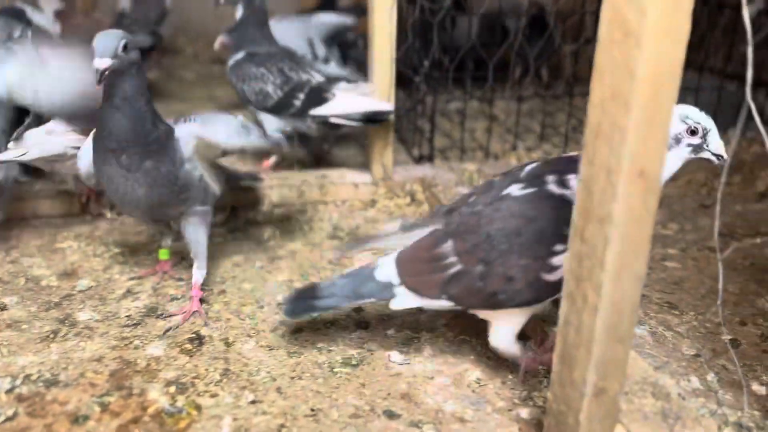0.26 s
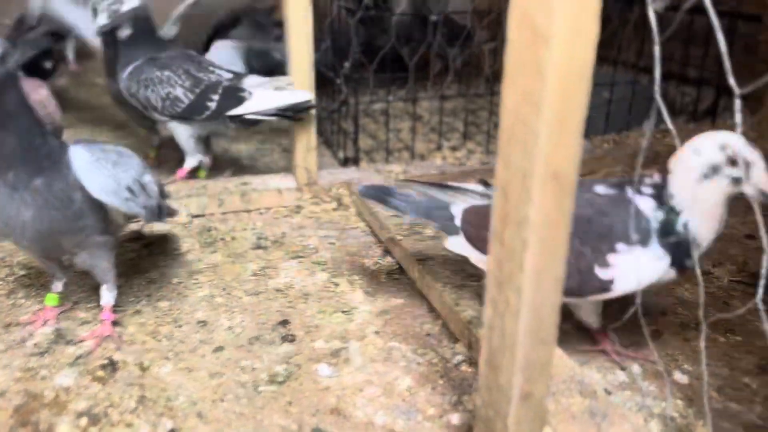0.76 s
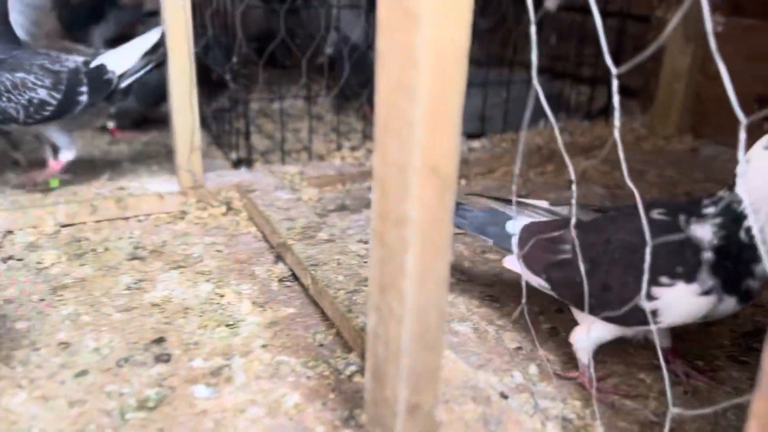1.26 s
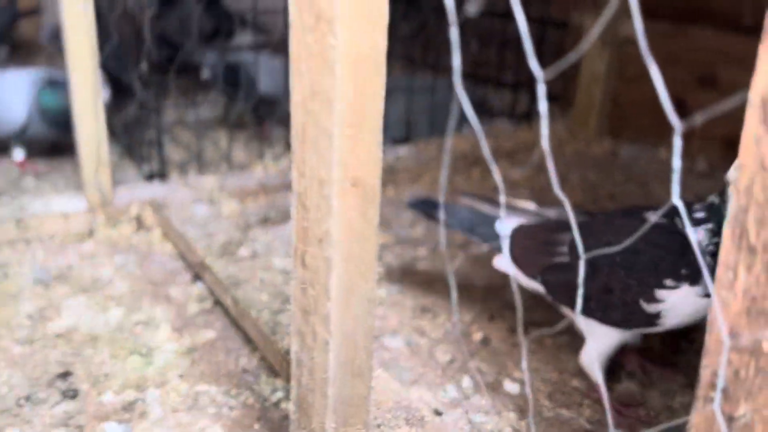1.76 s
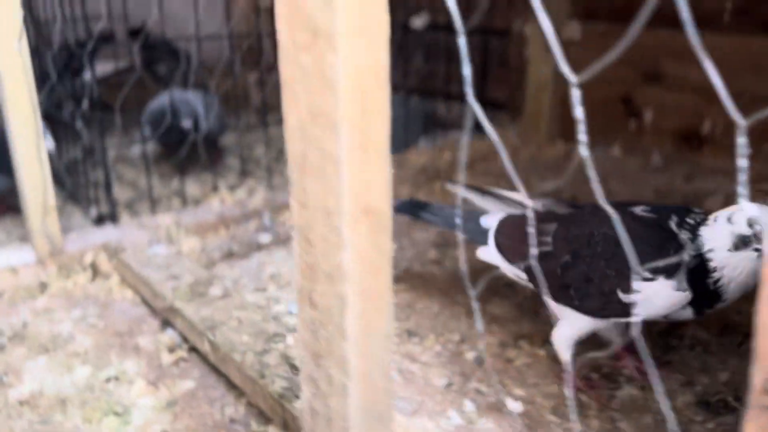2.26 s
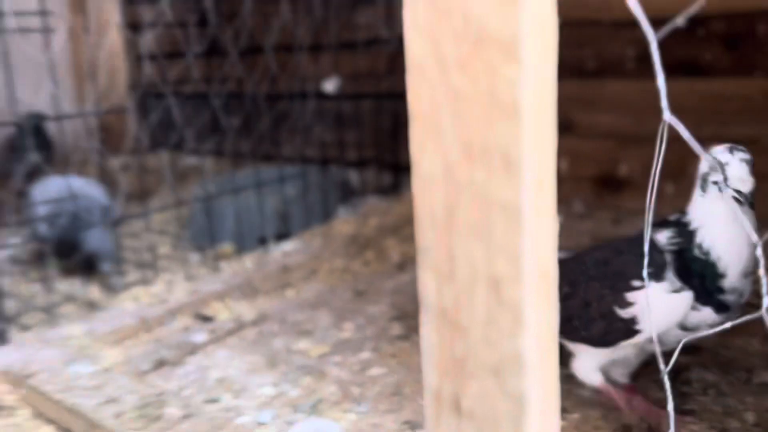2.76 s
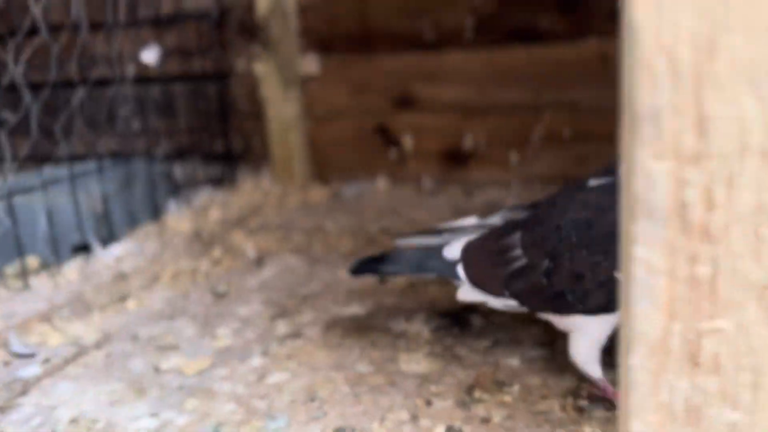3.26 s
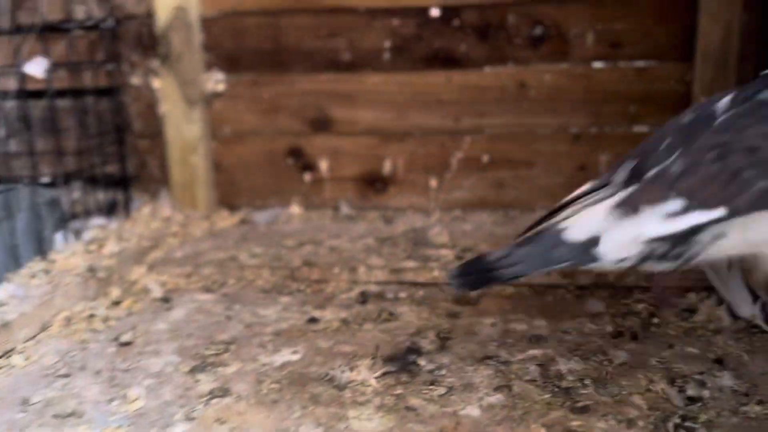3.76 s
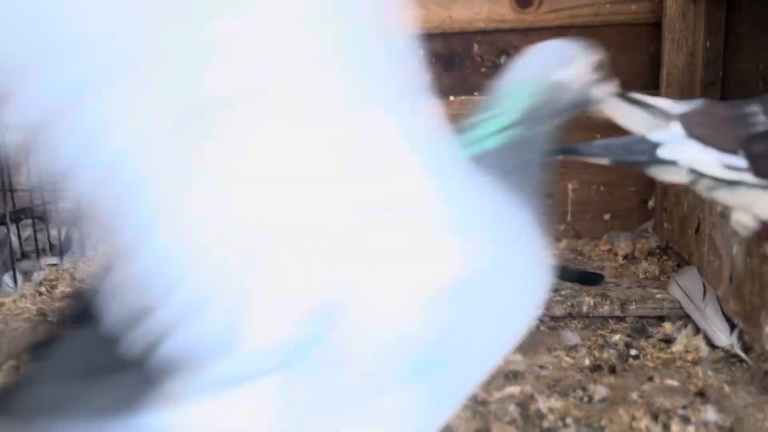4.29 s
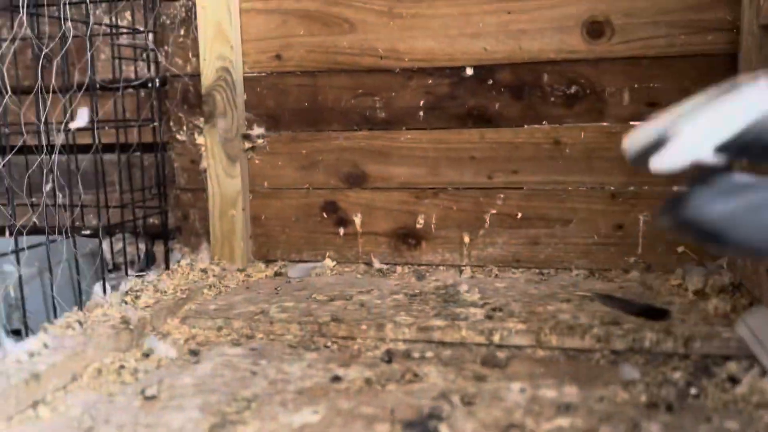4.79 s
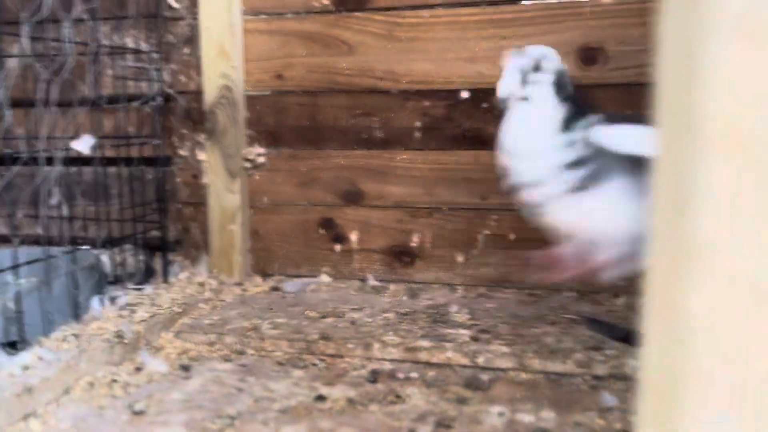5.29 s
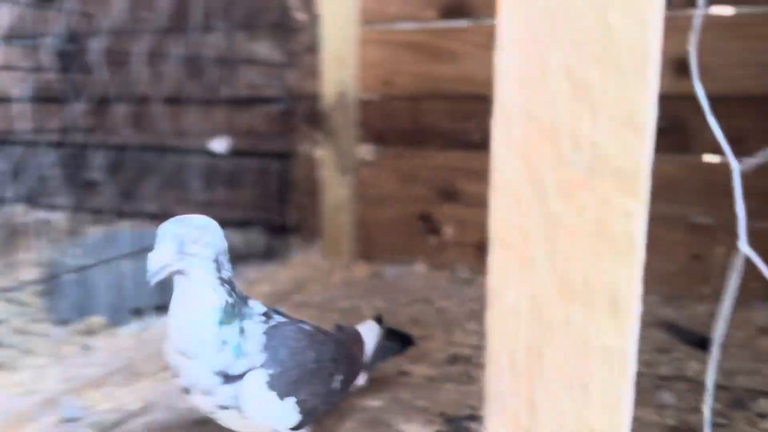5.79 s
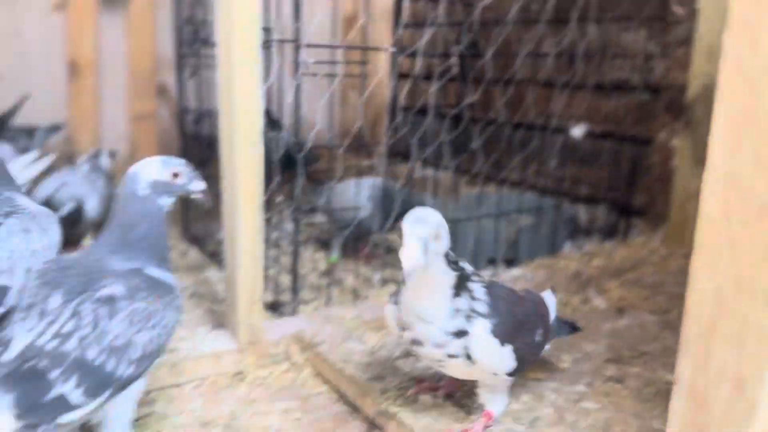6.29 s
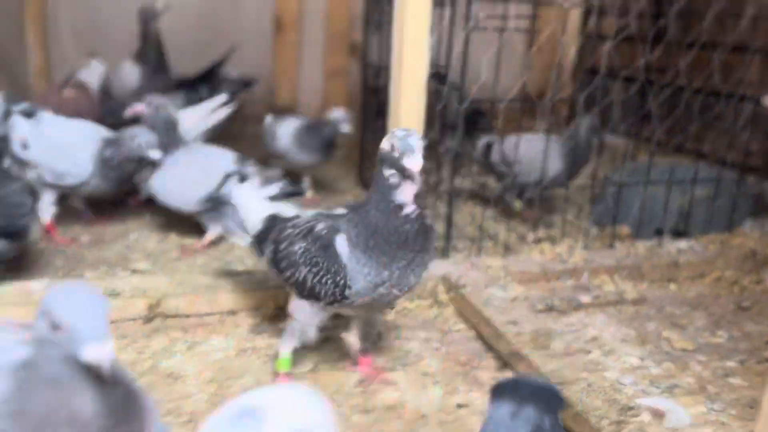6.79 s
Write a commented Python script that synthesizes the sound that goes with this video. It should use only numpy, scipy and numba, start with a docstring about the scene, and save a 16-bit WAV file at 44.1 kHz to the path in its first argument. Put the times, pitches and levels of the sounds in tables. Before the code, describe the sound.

High, hoarse begging squeaks of young pigeons overlap with close wing claps, rustling and light footfalls on wooden boards.

```python
"""Long wavering squeaks of young pigeons begging fill a crowded wooden loft. Each is a gliding whistle,
roughened by a fluttering membrane and rasping breath. Feathers rustle, wings clap and brush, and their
draught buffets a low microphone with eddies. Feet set the boards ringing, quills snap, claws briefly
ping the wire mesh, and the walls return a short, dull reverberation."""
import sys
import numpy as np
from scipy import signal
from scipy.io import wavfile
from scipy.ndimage import uniform_filter1d
from numba import njit

SR = 44100
rng = np.random.default_rng(int(sys.argv[2]) if len(sys.argv) > 2 else 0)


def generate_wav(signal):
    """Clip the signal to [-1, 1] and save it as 16-bit WAV at the path in sys.argv[1]."""
    frames = np.transpose(np.atleast_2d(signal))
    scaled = np.clip(frames, -1, 1) * 32767
    pcm = np.round(scaled).astype(np.int16)
    wavfile.write(sys.argv[1], SR, pcm)


N = 310905
ANTIPHASE = np.array([[1], [-1]])  # left plus, right minus


def undb(db):
    return 10 ** (np.asarray(db) / 20)


def level(x, db):
    """Scale a signal to an RMS level."""
    return x * undb(db) / np.sqrt(np.mean(x ** 2))


def band(x, lo_hz, hi_hz, order=2):
    return signal.sosfilt(signal.butter(order, [lo_hz, hi_hz], "band", fs=SR, output="sos"), x)


def walk(rate_hz):
    """Smooth random modulation: values held for 1 / rate_hz seconds, averaged twice; spread near 1."""
    hold = int(SR / rate_hz)
    held = np.repeat(rng.standard_normal(N // hold + 1), hold)
    return 1.6 * uniform_filter1d(uniform_filter1d(held, hold), hold)[:N]


def curves(table):
    """Linear interpolation of each column against the times in the first."""
    times, *columns = np.transpose(table)
    return [np.interp(np.arange(N) / SR, times, column) for column in columns]


def ports(x, pan_db, lag_samples=23):
    """Level and time differences place a source between two microphone ports; the right one lags."""
    return np.array([x * undb(pan_db / 2), np.roll(x, lag_samples) * undb(-pan_db / 2)])


def bursts(impulses, decay_s):
    """Exponential decay: each impulse starts a dying burst of noise."""
    return signal.lfilter([1], [1, -np.exp(-1 / (decay_s * SR))], impulses) * rng.standard_normal(N)


def ring(force, modes):
    """Modal superposition: a struck body answers with a sum of damped sinusoids."""
    out = 0
    for hz, db, t60_s in modes:
        pole = np.exp((2j * np.pi * hz - np.log(1000) / t60_s) / SR)
        out = out + undb(db) * signal.lfilter([1], [1, -pole], force).imag
    return out


# Begging calls. Each row: hoarseness from 0 to 1, then a list of points.
# Each point: time in seconds, pitch in Hz, level in dB.
SQUEAKS = [ (0.28, [(0, 4046, -34), (.046, 3920, -37.5), (.1, 3140, -38), (.125, 3500, -41),
           (.15, 3456, -40), (.19, 3380, -40.5), (.25, 3500, -45), (.3, 3580, -43), (.38, 3620, -47)]),
           (0.26, [(.35, 4220, -48), (.4, 4340, -37), (.44, 4670, -43), (.49, 4450, -41),
           (.53, 4264, -41.5), (.62, 4160, -35)]), (0.17, [(.34, 3750, -53), (.4, 3900, -54),
           (.44, 4350, -47), (.47, 4360, -41), (.53, 4080, -40)]), (0.315, [(.44, 2590, -44),
           (.52, 3290, -42), (.58, 3330, -52), (.65, 3380, -42), (.74, 3455, -49.5), (.8, 3560, -47),
           (.97, 3440, -45)]), (0.33, [(.74, 3830, -40), (.8, 4370, -44), (.86, 4170, -51),
           (.92, 4280, -48), (.98, 3850, -43), (1.03, 4300, -36)]), (0.23, [(1.12, 2570, -45),
           (1.18, 3160, -39), (1.2, 3940, -38.5), (1.305, 3880, -39), (1.345, 4280, -42.5),
           (1.39, 3970, -45), (1.45, 4310, -43), (1.5, 3870, -41.5), (1.59, 4260, -46), (1.67, 3870, -46),
           (1.83, 3950, -60)]), (0.22, [(1.31, 4350, -46), (1.34, 4680, -38), (1.37, 4370, -57),
           (1.44, 4700, -37), (1.5, 4250, -58), (1.56, 4790, -35), (1.62, 4480, -45), (1.65, 4770, -42),
           (1.71, 4490, -37), (1.775, 4800, -39), (1.82, 3870, -44.5), (1.845, 2610, -46)]),
           (0.423, [(2.0, 2520, -51), (2.12, 2698, -48.5), (2.17, 3300, -33.5), (2.21, 3150, -46),
           (2.25, 3400, -34), (2.31, 3450, -55), (2.36, 3430, -37.5), (2.42, 3376, -49), (2.5, 3360, -41),
           (2.55, 3340, -45.5), (2.61, 3380, -34.5), (2.67, 3450, -38.5), (2.72, 3650, -47),
           (2.84, 3260, -41.5), (2.87, 3210, -40), (2.9, 2726, -38), (2.93, 3150, -42), (2.96, 2850, -61)]),
           (0.364, [(2.11, 3110, -51), (2.17, 3844, -54), (2.21, 3260, -39.5), (2.27, 4000, -43),
           (2.33, 4040, -36), (2.365, 4280, -37), (2.42, 4110, -47), (2.47, 4240, -43), (2.52, 4150, -41.5),
           (2.57, 4020, -49), (2.625, 4170, -41), (2.68, 4050, -51), (2.73, 4120, -41), (2.78, 4070, -55)]),
           (0.35, [(2.335, 3970, -48), (2.385, 3600, -38.5), (2.43, 3900, -48), (2.5, 3630, -41.5),
           (2.56, 3690, -45.5), (2.63, 3850, -43), (2.67, 3750, -54)]), (0.55, [(2.26, 4050, -48),
           (2.32, 4560, -44), (2.4, 4580, -50), (2.78, 4670, -46.5)]), (0.28, [(3.27, 2687, -35),
           (3.35, 3127, -40), (3.43, 3033, -43), (3.5, 3520, -47), (3.53, 3580, -31), (3.59, 3554, -34.5),
           (3.62, 3200, -36.5), (3.68, 3410, -43), (3.77, 3540, -42), (3.84, 3380, -44), (3.9, 3270, -39),
           (3.97, 3115, -38.5), (4.03, 2590, -49.5)]), (0.25, [(3.62, 4490, -46), (3.66, 4550, -39),
           (3.7, 4580, -43), (3.75, 4770, -44), (3.82, 4730, -35), (3.87, 4520, -41.5),
           (3.94, 3735, -45.5)]), (0.93, [(3.27, 3196, -42), (3.31, 3533, -54), (3.4, 3630, -56),
           (3.5, 3770, -46), (3.6, 3990, -41)]), (0.56, [(3.64, 3600, -43), (3.7, 3730, -46),
           (3.76, 3880, -40.5), (3.82, 4060, -52)]), (0.27, [(4.7, 3610, -59), (4.77, 3620, -52),
           (4.81, 3880, -50), (4.89, 3690, -45), (5.17, 3852, -41.5), (5.21, 4170, -40), (5.27, 4080, -36),
           (5.325, 4620, -33.5), (5.35, 4290, -33), (5.38, 4100, -36), (5.43, 4330, -35), (5.5, 4070, -43),
           (5.55, 4760, -29.5), (5.6, 4900, -40), (5.66, 4670, -50)]), (0.3, [(4.785, 2700, -43),
           (4.83, 3180, -36), (4.89, 2824, -40.5), (5.0, 3590, -46), (5.06, 3350, -34), (5.11, 3610, -45),
           (5.17, 3470, -33.5), (5.22, 3426, -48), (5.27, 3540, -35.5), (5.34, 3530, -46),
           (5.41, 3630, -43), (5.47, 3600, -49), (5.51, 3470, -47), (5.62, 3420, -51.5), (5.72, 3230, -49),
           (5.76, 3200, -43), (5.8, 3150, -51)]), (0.16, [(5.9, 2830, -52), (5.93, 3240, -49),
           (5.98, 2980, -58), (6.13, 3260, -65)]), (0.461, [(6.17, 2620, -41), (6.23, 3210, -42),
           (6.45, 3403, -46.5), (6.6, 3370, -42), (6.66, 3620, -36)]), (0.24, [(6.7, 3450, -32),
           (6.77, 3590, -42), (6.84, 3415, -39), (6.9, 3350, -51), (6.97, 3295, -37.5), (7.05, 3110, -55)]),
           (0.46, [(6.19, 3156, -45), (6.25, 3950, -48), (6.31, 3600, -42), (6.36, 3820, -43.5),
           (6.45, 4130, -42.5), (6.64, 4360, -37)]), (0.273, [(6.71, 3890, -41.5), (6.87, 3900, -45),
           (6.94, 3930, -48), (7.0, 3680, -50), (7.05, 4180, -43)]), ]


def squeaks(flutter_hz=400, quaver=.008, jump_s=.03, fade_s=.015, beak_hz=7700, beak_width_hz=1300):
    """Modulation by a fluttering membrane and rasping air adds sidebands that make a whistle hoarse."""
    out, t = np.zeros(N), np.arange(N) / SR
    for hoarse, points in SQUEAKS:
        hz, effort_db = uniform_filter1d(curves(points), int(.008 * SR))
        held = np.repeat(rng.standard_normal(int(N / SR / jump_s) + 1), int(jump_s * SR) + 1)[:N]
        jumps = .014 * uniform_filter1d(held, int(.004 * SR))
        detune = quaver * walk(55) + jumps + (.003 + .045 * hoarse ** 2) * walk(400)
        flutter = np.sin(2 * np.pi * np.cumsum(flutter_hz * (1 + .15 * walk(30))) / SR)
        phase = 2 * np.pi * np.cumsum(hz * (1 + detune)) / SR + (.2 + 1.5 * hoarse ** 2) * flutter
        resonance = np.exp(-((2 * hz - beak_hz) / beak_width_hz) ** 2)  # the beak passes the octave
        octave = undb(-13) * (1.35 + .54 * walk(60)) * resonance * np.sin(2 * phase)
        swell_db = 2 * walk(75)
        falter_db = -9 * np.clip(walk(45) - .4, 0, 2)  # the voice briefly fails
        rasp = 1 + (.1 + .55 * hoarse) * walk(700)
        gate = np.clip(np.minimum(t - points[0][0], points[-1][0] - t) / fade_s + .5, 0, 1)
        out += np.sqrt(2) * gate * undb(effort_db + swell_db + falter_db) * rasp * (np.sin(phase) + octave)
    return out


# Activity of the flock. Each row: time in seconds, level in dB.
BUSTLE = [(0.0, -41.5), (0.27, -44.5), (0.42, -37.5), (1.43, -34), (1.69, -37), (1.9, -45.5), (2.4, -50.5),
          (2.94, -48), (3.4, -41.5), (3.77, -46), (4.24, -43), (4.5, -42), (4.7, -44), (5.1, -46.5),
          (5.52, -41.5), (5.9, -51.5), (6.42, -43), (6.69, -34.5), (7.05, -42.5)]
# Spectrum of its rustle. Each row: frequency in Hz, relative spectral density in dB.
RUSTLE_SPECTRUM = [(250, -12), (500, -18.5), (1000, -27.5), (2000, -32), (4000, -32.5), (7300, -41.5),
                   (10000, -9.5), (13500, -99), (16000, -40.5)]


def bustle(ticks_per_s=60):
    """Friction of feet and feathers: noise bands swell together, flicker alone and spike as claws tick."""
    out, swell_db = 0, 1.4 * walk(6.4)
    ticks = (rng.random(N) < ticks_per_s / SR) * undb(46 + 2 * rng.exponential(size=N))
    envelope = signal.lfilter([.004], [1, -.996], 1 + ticks)
    spectrum_hz, spectrum_db = np.transpose(RUSTLE_SPECTRUM)
    for hz in 250 * 2 ** np.arange(0, 6.1, .5):
        mid, side = band(envelope * rng.standard_normal((2, N)), hz / 1.324, hz * .95, order=1)
        db = np.interp(np.log(hz), np.log(spectrum_hz), spectrum_db) + swell_db + 2.2 * walk(12)
        width = min(hz / 720, 1)
        out = out + undb(db) * (mid + width * side * ANTIPHASE)
    return level(out, .13) * undb(curves(BUSTLE)[0])


# Gusts from close wings. Each row: time of the peak in seconds, level in dB, fall time in seconds.
GUSTS = [(0.26, -36.5, 0.053), (0.353, -43, 0.022), (0.8, -46, 0.019), (0.964, -39, 0.018),
         (1.466, -20.5, 0.013), (1.559, -24.5, 0.034), (1.747, -16.5, 0.12), (1.829, -17.5, 0.077),
         (2.076, -35, 0.07), (2.893, -39, 0.034), (3.094, -25, 0.0092), (3.302, -27, 0.018),
         (3.495, -29, 0.067), (4.397, -18, 0.061), (4.588, -26.5, 0.022), (4.863, -30, 0.017),
         (5.07, -41, 0.045), (5.405, -26.5, 0.019), (5.58, -39, 0.021), (5.965, -38.5, 0.047),
         (6.557, -34, 0.016), (6.664, -27, 0.014), (6.806, -19.5, 0.019), (6.933, -34, 0.044)]


def gusts(stir_db=3, rise_share=.59):
    """Envelope of the airflow: Gaussian gusts, quicker to rise than fall, over air the bustle stirs."""
    t = np.arange(N) / SR
    air = undb(curves(BUSTLE)[0] + stir_db + 3.6 * walk(9))
    for peak, db, fall_s in GUSTS:
        width_s = fall_s * np.where(t < peak, rise_share, 1)
        air += undb(db) * np.exp(-((t - peak) / width_s) ** 2)
    return air


# Single strong eddies. Each row: start in seconds, level in dB, frequency in Hz.
EDDIES = [(1.488, -19.5, 285), (1.714, -12.5, 282), (1.786, -11, 262), (1.801, -11.5, 492),
          (1.818, -4, 360), (4.341, -21.5, 310), (4.375, -15.5, 285), (4.381, -16.5, 290),
          (4.424, -13, 330), (4.433, -16.5, 290), (6.658, -32, 242), (4.376, -6.5, 57), (1.743, -8, 99)]


def draught(shedding_hz=97, pop_cycles=1.09):
    """Vortex shedding at a wandering rate thumps both ports much alike; lone eddies pop briefly."""
    mid, side = rng.standard_normal((2, N))
    shedding = np.sin(2 * np.pi * np.cumsum(shedding_hz * 2 ** (.25 * walk(25))) / SR)
    rumble = level(band(mid, 36.3, 155, order=3), -3)
    spread = level(band(side, 39, 189, order=3), -10.5) * ANTIPHASE
    pops, t = np.zeros(N), np.arange(N) / SR
    for start, db, hz in EDDIES:
        cycles = np.clip((t - start) * hz, 0, 30)
        wave = np.sin(2 * np.pi * cycles) + .2 * np.sin(4 * np.pi * cycles)
        pops += undb(db) * wave * np.exp(-((cycles - pop_cycles) / pop_cycles) ** 2)
    air = gusts()
    churn = level(band(rng.standard_normal(N), 450, 476, order=1), -5.5) * air ** 2  # in hard gusts
    return air * (undb(-1) * shedding + rumble + spread) + churn + pops


# Wing claps and brushes. Each row: start in seconds, level in dB, relative gain of the low band in dB,
# sweep time in seconds.
FLAPS = [(0.041, -37.5, 0.5, 0.023), (0.249, -31.5, -5.5, 0.041), (0.475, -40, 8, 0.059),
         (0.573, -31.5, 3, 0.036), (0.773, -25, -3, 0.036), (0.8737, -14, -9, 0.02),
         (0.982, -16, -5.5, 0.023), (1.092, -16, -4.5, 0.028), (1.202, -29, -0.5, 0.05),
         (1.308, -34.5, 3.5, 0.041), (1.405, -28.5, -0.5, 0.048), (1.455, -31.5, 2, 0.037),
         (1.503, -33, 4, 0.11), (1.61, -21.5, -6.5, 0.014), (1.7023, -30.5, 4.5, 0.024),
         (1.862, -38.5, 3.5, 0.011), (1.893, -40, -33, 0.0075), (2.87, -37, 2, 0.014),
         (2.997, -36, -11, 0.015), (3.023, -40, -9, 0.01), (3.088, -34, -0.5, 0.011),
         (3.279, -32, -2, 0.0088), (3.356, -24, -7.5, 0.023), (3.4137, -25, -4.5, 0.013),
         (3.471, -30.5, -3, 0.066), (3.579, -27.5, -6, 0.029), (3.699, -33.5, -17, 0.073),
         (3.77, -31.5, -40, 0.013), (4.229, -33.5, -9, 0.049), (4.321, -24, -2.5, 0.04),
         (4.436, -32, 4.5, 0.034), (4.531, -36.5, 1, 0.011), (4.569, -26, -16, 0.0099),
         (4.638, -37.5, -2, 0.028), (4.698, -37.5, -31, 0.017), (5.38, -37, 8, 0.0079),
         (5.557, -40.5, 10, 0.015), (5.909, -37.5, -6, 0.025), (6.138, -39, -8, 0.0098),
         (6.54, -29.5, -3.5, 0.025), (6.5934, -20.5, -1, 0.019), (6.818, -27, -11, 0.036),
         (7.0116, -29, -12, 0.091)]


def flaps(rise_s=.003, slap_s=.009, trail_s=.03):
    """Impact, then friction: feathers slap, sweep past each other and trail off; the boards ring along."""
    t = np.arange(int(.15 * SR)) / SR
    slap = undb(-1) * np.exp(-t / slap_s)
    trail = undb(-18) * np.exp(-t / trail_s)
    low_envelope, envelope = np.zeros((2, N + len(t)))
    for start, db, low_db, sweep_s in FLAPS:
        sweep = np.exp(-(t / sweep_s) ** 2)
        shape = (slap + sweep) * np.minimum(t / rise_s, 1) / 2 + trail
        span = slice(int(start * SR), int(start * SR) + len(t))
        low_envelope[span] += undb(db + low_db) * shape
        envelope[span] += undb(db) * shape
    crackle = undb(2.5 * walk(900))
    feathers = ports(crackle * rng.standard_normal(N), pan_db=23.5)
    feathers += .8 * crackle * rng.standard_normal((2, N))  # a wide wing: each port hears its own part
    low = low_envelope[:N] * level(band(feathers, 400, 2300), 0)
    low *= undb(-5.5 * ANTIPHASE)  # the low band leans less to the left
    brush = band(feathers, 2300, 11500)
    middle = envelope[:N] * level(brush + undb(-1) * band(brush, 6100, 8260, order=1), -5)
    top = envelope[:N] * level(band(feathers, 11500, 17500), -14.56)
    # Adjacent bands alternate in sign so that they join without a dip.
    return low - middle + top + undb(-52) * ring(low, BOARD_MODES)


def knocks(contacts, modes, scuff_s, scuff_db, ring_db, tap_db):
    """Impact excitation: a tap and a scuff of noise are heard directly and drive a body's modes."""
    blows = np.zeros(N)
    for start, db in contacts:
        blows[int(start * SR)] = undb(db)
    force = bursts(blows, scuff_s) + undb(tap_db) * blows
    return undb(ring_db) * ring(force, modes) + undb(scuff_db) * band(force, 210, 3400, order=1)


# Modes of the boards. Each row: frequency in Hz, gain in dB, time to decay by 60 dB in seconds.
BOARD_MODES = [(284, 15.5, 0.05), (520, 13, 0.017), (806, 11, 0.018), (984, 23, 0.005), (1350, 19, 0.0059),
               (2320, 22, 0.0025)]
# Footfalls. Each row: start in seconds, level of the blow in dB.
STEPS = [(0.172, -30.5), (0.282, -28.5), (2.379, -36.5), (2.555, -38), (2.656, -31.5), (2.735, -38),
         (2.751, -37.5), (3.028, -36.5), (3.141, -29), (3.19, -38), (3.401, -23), (3.54, -28.5),
         (4.194, -31.5), (4.252, -29), (4.46, -23.5), (4.479, -31), (4.573, -25), (4.645, -34),
         (4.809, -34.5), (4.93, -38.5), (5.163, -34), (5.383, -29), (5.498, -32), (5.56, -31.5),
         (5.697, -37.5), (6.297, -38), (6.489, -35), (6.644, -24), (6.823, -22.5), (6.904, -40),
         (7.02, -24.5)]


def footsteps():
    """Feet and bodies strike the boards, whose heavy damping leaves only a short knock."""
    return knocks(STEPS, BOARD_MODES, scuff_s=.015, scuff_db=-2.5, ring_db=-43.5, tap_db=3)


# Quill snaps. Each row: start in seconds, level in dB, relative gain of the bright band in dB.
SNAPS = [(3.0903, -29, -13), (3.2774, -25, -20), (3.3583, -27, -8), (3.4745, -15, -9), (4.1949, -33, -14),
         (4.3242, -11.5, 3), (4.5735, -10.5, -11), (4.637, -24, -15), (5.5583, -23, -23), (5.912, -28, -2),
         (6.5958, -6.5, -5), (6.821, -15, -23), (7.0199, -37, -11)]


def quill_snaps(decay_s=.0024, dull_db=-5.5):
    """A brief transient has a broad spectrum: quills snap past each other in dull and bright noise."""
    dull, bright = np.zeros((2, N))
    for start, db, bright_db in SNAPS:
        dull[int(start * SR)] = undb(db + dull_db)
        bright[int(start * SR)] = undb(db + bright_db)
    return (band(bursts(dull, decay_s), 700, 5000, order=1)
            + band(bursts(bright, decay_s), 7600, 17000, order=3))


# Modes of the mesh. Each row: frequency in Hz, gain in dB, time to decay by 60 dB in seconds.
WIRE_MODES = [(5040, 5, 0.016), (5540, -2, 0.023)]
# Claw strikes. Each row: start in seconds, level of the blow in dB.
PINGS = [(3.1501, -30), (3.1767, -29), (3.2044, -41)]


def mesh_pings():
    """A short contact excites high modes: claws pluck the wire mesh."""
    return knocks(PINGS, WIRE_MODES, scuff_s=.00084, scuff_db=-32, ring_db=-10, tap_db=-3)


@njit
def walls(x, lags, gain, damping):
    """Reverberation by repeated reflection: eight coupled delay lines lose treble on every round."""
    line, dulled, out = np.zeros((8, 4096)), np.zeros(8), np.zeros((2, len(x)))
    for i in range(len(x)):
        total = 0.
        for k in range(8):
            dulled[k] += (1 - damping) * (gain[k] * line[k, (i - lags[k]) & 4095] - dulled[k])
            total += dulled[k]
            out[k % 2, i] += dulled[k]
        for k in range(8):
            line[k, i & 4095] = x[i] + dulled[k] - total / 4
    return out


def scene(t60_s=.22, damping=.25):
    """Superposition of the birds' direct sound, its reflections, the rustle and the draught."""
    calls = squeaks()
    wings = flaps() + ports(quill_snaps(), pan_db=-7, lag_samples=7)
    feet = footsteps() + mesh_pings()
    direct = ports(calls, pan_db=6) + ports(feet, pan_db=-1, lag_samples=6) + wings
    radiated = calls + undb(-4.5) * (wings[0] + feet) + 1e-18  # the offset prevents underflow
    lags = rng.integers(300, 1500, 8)
    reverberation = walls(radiated, lags, undb(-60 * lags / SR / t60_s), damping)
    return direct + undb(-9) * reverberation + bustle() + draught()


def record(dry, top_hz=16000):
    """Mid-side filtering: the centre is hollow near 11 kHz, width ends just above, and the top is cut."""
    mid, side = (dry[0] + dry[1]) / 2, (dry[0] - dry[1]) / 2
    mid = signal.sosfilt(signal.butter(4, [10100, 12600], "bandstop", fs=SR, output="sos"), mid)
    side = signal.sosfilt(signal.butter(6, 12600, fs=SR, output="sos"), side)
    return signal.sosfilt(signal.ellip(8, .2, 70, top_hz, fs=SR, output="sos"), mid + side * ANTIPHASE)


dry = scene()
out = record(dry)
generate_wav(out)
```